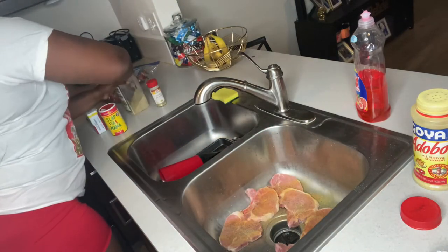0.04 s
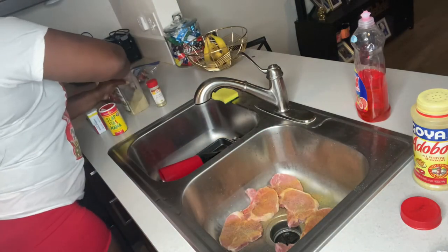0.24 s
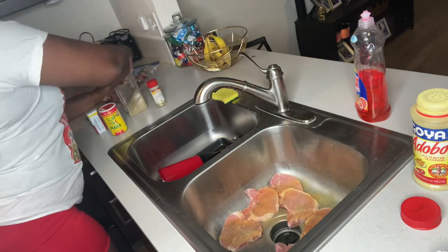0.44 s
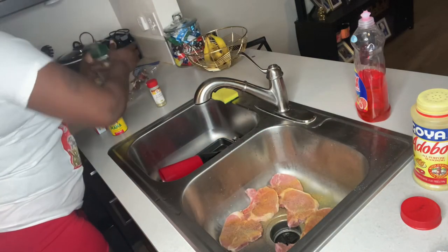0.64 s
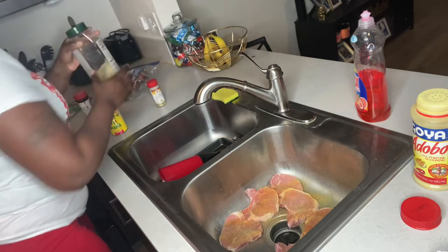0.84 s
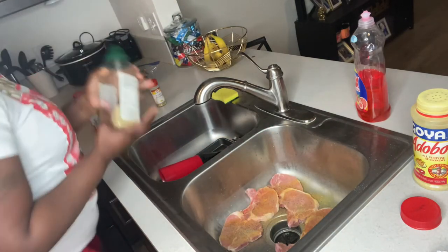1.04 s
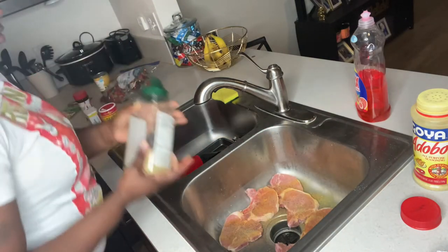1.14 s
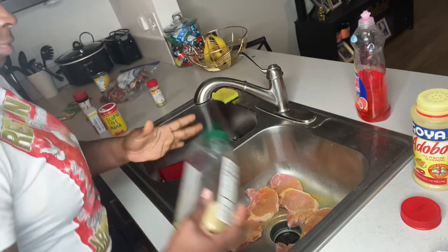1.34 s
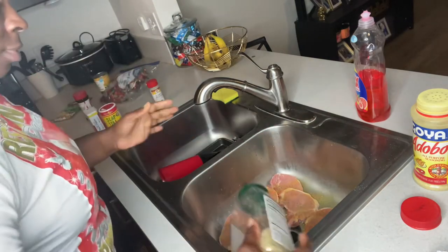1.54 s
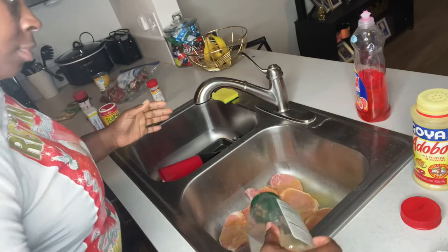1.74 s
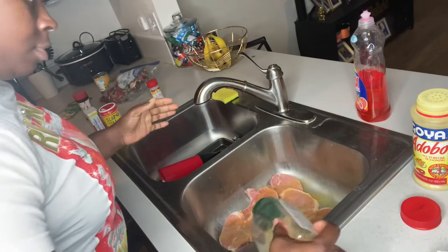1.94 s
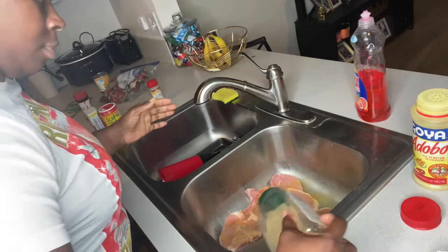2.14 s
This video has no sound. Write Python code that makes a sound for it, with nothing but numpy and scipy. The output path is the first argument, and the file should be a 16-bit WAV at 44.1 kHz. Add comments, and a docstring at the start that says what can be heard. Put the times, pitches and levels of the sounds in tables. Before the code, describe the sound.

A plastic seasoning bottle taps, then knocks hard on a kitchen worktop with a brief clatter and room ring. Powder shifts faintly inside, then is shaken out in soft, quick hisses. A low motor hums throughout, heard nearby in stereo.

```python
"""A plastic seasoning bottle is picked up and shaken beside a steel kitchen sink, heard in stereo.
Containers tap, then knock hard on the worktop: near surfaces clatter and the room rings behind them.
The powder shifts as the bottle is carried over, slides forward as it is tipped, and is shaken out
five times a second, its grains hissing against the plastic.
In the background a motor hums low throughout, with a faint thin whine."""
import sys
import numpy as np
from scipy import signal
from scipy.fft import rfft, irfft
from scipy.io import wavfile

SR = 44100
rng = np.random.default_rng(int(sys.argv[2]) if len(sys.argv) > 2 else 0)


def store_wav(level_fs):
    """Save 16-bit WAV to argv[1]."""
    pcm = np.round(np.clip(np.atleast_2d(level_fs), -1, 1) * 32767)
    wavfile.write(sys.argv[1], SR, pcm.T.astype(np.int16))


N = 97020
T = np.arange(N) / SR
BIN_HZ = np.arange(N // 2 + 1) * SR / N
EDGES_HZ = 25 * 2 ** (np.arange(29) / 3)   # third octaves
CENTRES_HZ = np.sqrt(EDGES_HZ[1:] * EDGES_HZ[:-1])

# stereo width and balance, narrowing to the centre around 8-10 kHz:
# frequency_hz, likeness (-1 to 1), pan_db (left over right)
STEREO_IMAGE = [(60, 0.27, 0), (130, 0.28, -2.5), (230, 0.15, 8.5), (390, -0.31, 5.5), (694, -0.12, 2.5),
                (1280, -0.33, 2), (2420, 0.28, 4.5), (4280, -0.094, 2), (6000, 0.15, 0.5), (8100, 1, -0.5),
                (10200, 1, 0), (13100, -0.69, 0)]
# air and machine rumble: frequency_hz, density_db
AIR_SPECTRUM = [(25, -18), (50, 2), (100, 9), (150, -5), (205, -9.5), (265, 1.5), (350, -8.5), (480, -8.5),
                (620, -23), (1100, -27.5), (2000, -37), (5000, -40), (10000, -49.5), (13000, -45),
                (16000, -70.5)]
# narrow bands that stand out of the air: pitch_hz, width_hz, level_db
AIR_DRONES = [(246.5, 14, -67), (7900, 55, -93)]
# the motor's hum: harmonic_number, level_db
MOTOR_HARMONICS = [(1, -48), (2, -59.5), (3, -70.5), (4, -70.5), (6, -75)]
# reverberation of the kitchen: frequency_hz, density_db, t60_s
ROOM_REVERB = [(95, -0.5, 1), (223, 6, .5), (330, -1, .55), (790, -3.5, 0.72), (1500, 1.5, 0.71),
               (2650, -3.5, .64), (3930, -4.5, 0.7), (6350, -9, 0.61), (8700, -9, 0.5), (11600, -11.5, .39),
               (12900, -22, .33), (16000, -37, .3)]
# clatter off the near surfaces: frequency_hz, density_db
CLATTER_SPECTRUM = [(100, -6.5), (220, -4), (340, -23.5), (550, -1.5), (720, -6), (1300, -3.5), (2400, -1),
                    (3300, -7.5), (4200, -8), (5500, -7.5), (8000, -7), (11000, -10.5), (14000, -25.5),
                    (16000, -26)]
# the cabinet under the hard knock: peak_s, level_db, pitch_hz, width_s, pan_db
CABINET_THUDS = [(.235, -25.5, 205, .004, 11), (.246, -32, 455, .009, 6), (0.266, -27.5, 68.1, 0.01, 3),
                 (.37, -39, 50.8, 0.021, 3)]
# containers knock on the worktop:
# start_s, blow_db, hollow_db, clink_db, tinkle_db, worktop_db, clatter_db, tilt_db_per_octave
CONTAINER_KNOCKS = [(0.1039, -17.5, -29, -45.5, -45.5, -26, -21, 0.2),
                    (0.2255, -0.5, -19.5, -22, -33.5, -1.5, 1, 0.32)]
# the container's hollow body: pitch_hz, level_db, t60_s
HOLLOW_MODES = [(885, -6.5, 0.042), (964, 3, 0.021), (1073, -9.5, 0.027)]
# short, hard modes of the worktop right under the blow: pitch_hz, level_db, t60_s
CLACK_MODES = [(1285, -21, 0.044), (2400, -17, .028), (4284, -17.5, 0.017)]
# worktop, sink and the things standing on them: pitch_hz, level_db, t60_s, pan_db
WORKTOP_MODES = [(178, -29, .17, 0), (232, -26.5, .2, 10), (458, -27, .15, 10), (770, -42, .3, 0),
                 (1125, -42, .4, 3), (1220, -31, .1, 6), (1330, -37, .33, 3), (1448, -38, .35, 10),
                 (1598, -33, .1, 8), (1801, -39, .3, 3), (1973, -29, .07, 10), (2331, -23, .06, 0),
                 (2444, -37, .21, 1), (2620, -37, .33, 0), (2912, -41, .45, 1), (3170, -40, .25, -3),
                 (3273, -42, .33, 0), (3655, -45, .3, 3), (3962, -45, .4, 0), (4202, -35, .14, 1),
                 (9541, -38, .17, 0)]
# the bottle scuffs in the hand: peak_s, rise_s, settle_s, level_db
HAND_SCUFFS = [(1.127, 0.01, 0.018, -66.5), (1.285, 0.025, 0.045, -65.5), (1.508, 0.0054, 0.024, -70)]
# colour of a scuff: frequency_hz, density_db
SCUFF_SPECTRUM = [(200, -17), (700, 1), (1450, 2.5), (2300, -2.5), (3300, -7.5), (4300, -6.5), (7000, -19),
                  (16000, -48.5)]
# hands bump the bottle softly: start_s, level_db
HAND_BUMPS = [(1.01, -48), (1.114, -48)]
# the tipped bottle gives a hollow tick: start_s, level_db
BOTTLE_TICKS = [(1.492, -62.5), (1.505, -54.5)]
# powder is thrown against the bottle: peak_s, rise_s, settle_s, hiss_db, wall_db
POWDER_THROWS = [(0.014, 0.065, 0.1, -88.5, -60.5), (.775, 0.017, 0.067, -71, -88),
                 (.83, .025, 0.11, -70, -75), (.93, 0.018, 0.043, -79, -71), (1.03, .025, .06, -74.5, -70),
                 (1.155, 0.041, 0.1, -74.5, -67), (1.22, 0.024, 0.036, -73.5, -72),
                 (1.295, 0.024, 0.056, -70, -71), (1.585, 0.041, .1, -61.5, -59),
                 (1.752, 0.042, 0.1, -60, -60.5), (1.85, 0.014, 0.091, -70, -66),
                 (1.95, 0.03, 0.057, -58, -58), (2.05, 0.024, 0.14, -67, -70.5),
                 (2.152, 0.038, 0.054, -59, -62)]
# grains on plastic: frequency_hz, density_db
HISS_SPECTRUM = [(500, -3.5), (1500, -7.5), (3000, -4), (4500, -2.5), (6500, -4), (9500, -3), (11500, -2.5),
                 (13000, -1.5), (14500, -18.5), (16000, -40)]
# the bottle wall under the grains: frequency_hz, density_db
WALL_SPECTRUM = [(150, 1.5), (400, 2.5), (800, 4.5), (1500, 0), (2300, -14.5), (4000, -33.5), (8000, -29),
                 (16000, -48)]
# powder sliding to the cap: frequency_hz, density_db
SLIDE_SPECTRUM = [(300, -35), (900, 6), (1500, 2.5), (2400, 2.5), (3300, -0.5), (6000, -10), (16000, -30)]
# the plastic rings under sliding powder: peak_s, rise_s, settle_s, pitch_hz, width_hz, level_db
PLASTIC_RINGS = [(.82, 0.019, 0.046, 2400, 150, -75), (1.265, .014, 0.019, 1850, 140, -72),
                 (1.53, 0.021, 0.094, 1490, 99, -67.5), (1.565, 0.012, 0.024, 2430, 120, -63)]

MOTOR_HZ, WHINE_HZ, CRACK_HZ = 59.4, 7840, 2190
ECHO_S, ECHO_DB = .0053, -4   # off the wall behind the worktop
REFLECTIONS_PER_S, GRAINS_PER_S = 7000, 14000


def from_db(db):
    """Decibels to gain."""
    return 10 ** (np.asarray(db) / 20)


def rms_one(x):
    """Scale to unit rms."""
    return x / np.sqrt(np.mean(x ** 2))


def at_hz(table, hz, column=1):
    """Read a column of a table on a log-frequency axis."""
    table = np.array(table)
    return np.interp(np.log(hz), np.log(table[:, 0]), table[:, column])


def pan(db):
    """Left and right gains, the left louder by db."""
    return from_db(np.array([[db / 2], [-db / 2]]))


def butterworth(x, order, hz, kind="low"):
    """Pass x through a Butterworth filter."""
    return signal.sosfilt(signal.butter(order, hz, kind, fs=SR, output="sos"), x)


def drift(rate_hz):
    """A random wander of rms 1, mostly slower than rate_hz."""
    return rms_one(irfft(rfft(rng.standard_normal(N)) / (1 + (BIN_HZ / rate_hz) ** 2), N))


def decay(start, t60):
    """Jumps to 1 at the start and dies away."""
    return (T >= start) * np.exp(-np.log(1000) * np.maximum(T - start, 0) / t60)


def build_up(start, rise_s):
    """Grows from 0 at the start towards 1."""
    return 1 - np.exp(-np.maximum(T - start, 0) / rise_s)


def swell(peak_s, rise_s, settle_s):
    """Rises smoothly to 1 at the peak, then settles."""
    age = T - peak_s
    return np.where(age < 0, np.exp(-.5 * (age / rise_s) ** 2), np.exp(-np.abs(age) / settle_s))


def ring(start, hz, t60):
    """A struck mode: a dying sine."""
    return decay(start, t60) * np.sin(2 * np.pi * hz * (T - start))


def resonance(hz, width_hz):
    """A resonance driven by noise, independent left and right, rms about 1."""
    phase = 2 * np.pi * hz * T
    return np.array([drift(width_hz) * np.sin(phase) + drift(width_hz) * np.cos(phase) for _ in range(2)])


def rippled(noise, depth_db, width_hz):
    """Give noise narrow random peaks and dips, as a dense crowd of resonances does."""
    place = BIN_HZ / width_hz
    heights = rng.standard_normal(int(place[-1]) + 2)
    ripple_db = depth_db * np.interp(place, np.arange(len(heights)), heights)
    return rms_one(irfft(rfft(noise) * from_db(ripple_db), N))


def wash(spectrum, excitation=1):
    """Broad stereo noise of a given colour, its width and balance set by frequency, rms 1."""
    hz = np.maximum(BIN_HZ, 1)
    alike = np.clip(at_hz(STEREO_IMAGE, hz), -1, 1)
    white = rfft(rng.standard_normal((2, N)) * excitation)
    mid, side = white * np.sqrt([1 + alike, 1 - alike]) * from_db(at_hz(spectrum, hz))
    lean = from_db(at_hz(STEREO_IMAGE, hz, column=2) / 2)
    return rms_one(irfft(np.array([(mid + side) * lean, (mid - side) / lean]), N))


def bands(spectrum, excitation=1):
    """Third octaves of stereo noise (bands x 2 x N), coloured by the kitchen's close resonances."""
    noise = rippled(rng.standard_normal((2, 2, N)) * excitation, depth_db=2.6, width_hz=24)
    gains = from_db(at_hz(spectrum, CENTRES_HZ)) * np.sqrt(CENTRES_HZ)
    gains /= np.linalg.norm(gains)
    out = []
    for k, hz in enumerate(CENTRES_HZ):
        mid, side = rms_one(butterworth(noise[k % 2], 2, EDGES_HZ[k:k + 2], "band"))
        alike = np.clip(at_hz(STEREO_IMAGE, hz), -1, 1)
        mid, side = mid * np.sqrt((1 + alike) / 2), side * np.sqrt((1 - alike) / 2)
        balance = pan(at_hz(STEREO_IMAGE, hz, column=2))
        out.append(gains[k] * balance * np.array([mid + side, mid - side]))
    return np.array(out)


def motor_and_air():
    """Room tone: a steady motor to the left with wavering overtones, drones, a whine and rumbling air."""
    hum = np.zeros(N)
    for harmonic, db in MOTOR_HARMONICS:
        waver = 0.083 * (harmonic > 1) * (drift(12) + 1j * drift(3.7))   # in level and phase
        tone = np.exp(2j * np.pi * (harmonic * MOTOR_HZ * T + rng.random()))
        hum += np.sqrt(2) * from_db(db) * np.real((1 + waver) * tone)
    drones = sum(from_db(db) * resonance(hz, width) for hz, width, db in AIR_DRONES)
    whine = np.sqrt(2) * from_db(-87.5) * np.sin(2 * np.pi * WHINE_HZ * T + 1.6 * drift(15))
    return hum * pan(4) + drones + whine + from_db(-54.5) * wash(AIR_SPECTRUM)


def kitchen():
    """The knocks scatter off the near surfaces, then die away farther out in the room, treble first."""
    out = np.zeros((2, N))
    far = bands(ROOM_REVERB)
    near = bands(CLATTER_SPECTRUM, rng.random(N) < REFLECTIONS_PER_S / SR)
    for start, blow_db, *_, clatter_db, tilt_db in CONTAINER_KNOCKS:
        clatter = from_db(clatter_db - 19) * decay(start, t60=0.064)
        bloom = from_db(blow_db - 24.5) * build_up(start, rise_s=0.0057)
        for k, hz in enumerate(CENTRES_HZ):
            tail = bloom * decay(start, at_hz(ROOM_REVERB, hz, column=2))
            tilt = from_db(tilt_db * np.log2(hz / CRACK_HZ))
            out += tilt * (near[k] * clatter + far[k] * tail) * build_up(start, rise_s=3.5 / hz)
    return butterworth(out, order=20, hz=12500)   # clatter and tail are cut steeply at the top


def cabinet():
    """The cabinet gives under the hard knock and rebounds, heaving for a cycle or two."""
    out = np.zeros((2, N))
    for peak, db, hz, width, pan_db in CABINET_THUDS:
        heave = np.exp(-.5 * ((T - peak) / width) ** 2)
        out += from_db(db) * heave * np.sin(2 * np.pi * hz * (peak - T)) * pan(pan_db)
    return out


def knocks():
    """Each contact cracks and echoes off the wall; the container and the worktop ring in their modes."""
    out = np.zeros((2, N))
    for start, blow_db, hollow_db, clink_db, tinkle_db, worktop_db, *_ in CONTAINER_KNOCKS:
        for arrival, path_db in [(start, 0), (start + ECHO_S, ECHO_DB)]:
            crack = from_db(blow_db - 11) * ring(arrival, CRACK_HZ, t60=0.0037)
            hard_edge = from_db(tinkle_db + 17.5) * ring(arrival, hz=10800, t60=0.0016)
            out += from_db(path_db) * (crack + hard_edge)
        answer = start + .0011   # the body answers just after the contact
        hollow = sum(from_db(hollow_db + db) * ring(answer, hz, t60) for hz, db, t60 in HOLLOW_MODES)
        out += hollow * build_up(answer, rise_s=0.0013) * pan(6)
        out += from_db(clink_db) * ring(start, hz=2513, t60=0.062)
        out += from_db(tinkle_db) * ring(start, hz=7420, t60=0.057)
        for hz, db, t60 in CLACK_MODES:
            out += from_db(blow_db + worktop_db + db) * ring(start, hz, t60)
        for hz, db, t60, pan_db in WORKTOP_MODES:
            onset = build_up(start, rise_s=3 / hz)   # the panels take a few cycles to get going
            out += from_db(worktop_db + db) * pan(pan_db) * ring(start, hz, t60) * onset
    return out


def handling():
    """Hands scuff and softly bump the bottle, and it ticks as it is tipped."""
    rub = sum(from_db(db) * swell(peak, rise, settle) for peak, rise, settle, db in HAND_SCUFFS)
    bumps = sum(from_db(db) * ring(start, hz=152.7, t60=0.25) for start, db in HAND_BUMPS)
    ticks = sum(from_db(db) * ring(start, hz=1470, t60=0.025) for start, db in BOTTLE_TICKS)
    return rub * wash(SCUFF_SPECTRUM) + bumps + ticks


def powder():
    """Thousands of tiny impacts hiss in the bottle and drive its wall, swelling with every throw."""
    impacts = rng.random(N) < GRAINS_PER_S / SR
    grains = impacts * from_db(-np.minimum(rng.exponential(1, N), 4))
    hiss_power, wall_power = np.zeros(N), np.zeros(N)
    for peak, rise, settle, hiss_db, wall_db in POWDER_THROWS:
        throw = swell(peak, rise, settle)
        hiss_power += (from_db(hiss_db) * throw) ** 2
        wall_power += (from_db(wall_db) * throw) ** 2
    tipping = swell(peak_s=1.546, rise_s=0.029, settle_s=0.072)
    slide = from_db(-56.5) * tipping * wash(SLIDE_SPECTRUM, grains)
    rings = sum(from_db(db) * swell(peak, rise, settle) * resonance(hz, width)
                for peak, rise, settle, hz, width, db in PLASTIC_RINGS)
    hiss = np.sqrt(hiss_power) * rippled(wash(HISS_SPECTRUM, grains), depth_db=2, width_hz=90)
    wall = np.sqrt(wall_power) * rippled(wash(WALL_SPECTRUM, grains), depth_db=2, width_hz=90)
    return butterworth(hiss + wall + slide + rings, order=14, hz=13600)


def scene():
    """Everything heard at the sink."""
    worktop_and_room = kitchen() + cabinet() + knocks()
    clumps = from_db(0.3 * drift(rate_hz=97))   # the powder falls unevenly
    bottle = handling() + clumps * powder()
    return motor_and_air() + worktop_and_room + bottle


def record(dry):
    """The microphones lose the deepest bass; the top is cut steeply."""
    heard = butterworth(dry, order=2, hz=37, kind="high")
    return signal.sosfilt(signal.cheby2(12, 70, 16500, fs=SR, output="sos"), heard)


dry = scene()
out = record(dry)
store_wav(out)
```